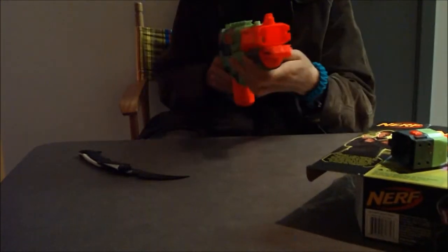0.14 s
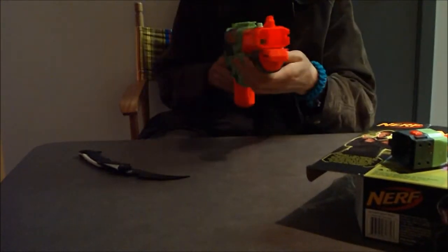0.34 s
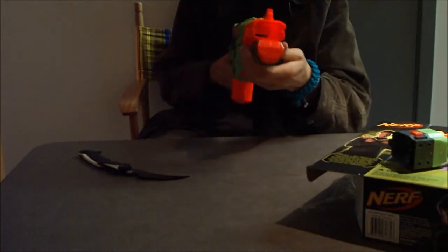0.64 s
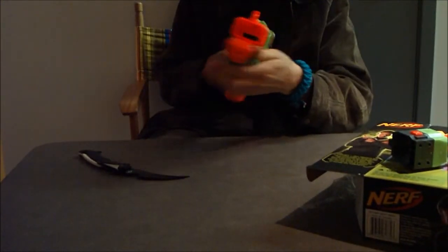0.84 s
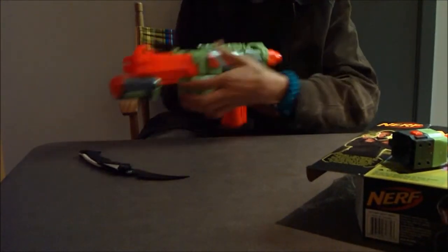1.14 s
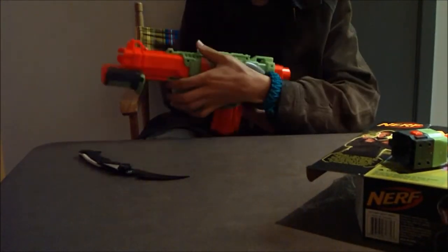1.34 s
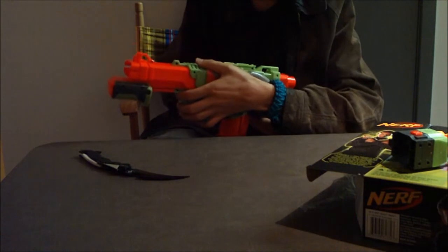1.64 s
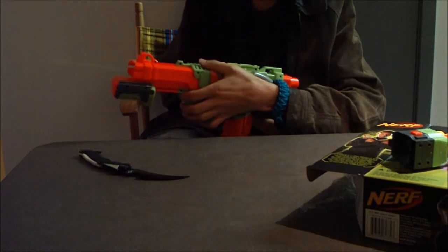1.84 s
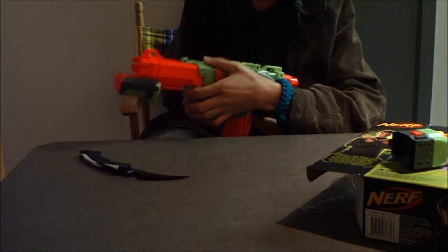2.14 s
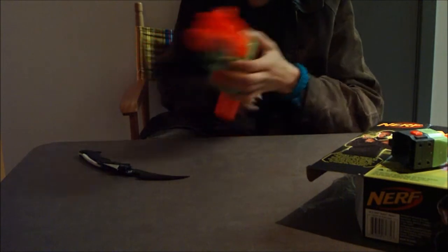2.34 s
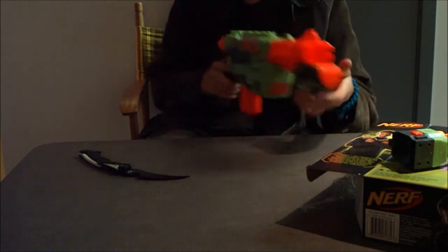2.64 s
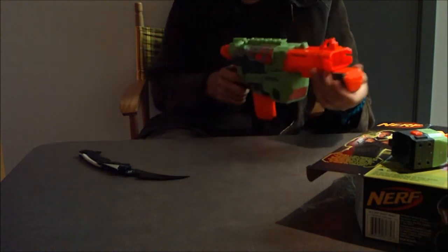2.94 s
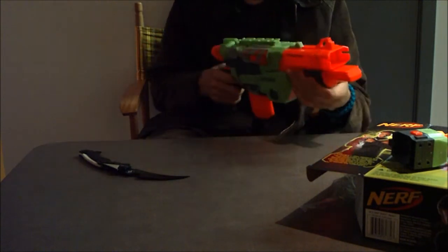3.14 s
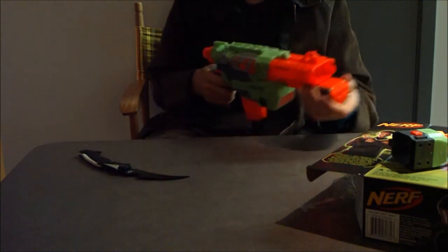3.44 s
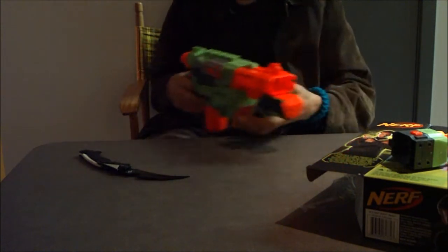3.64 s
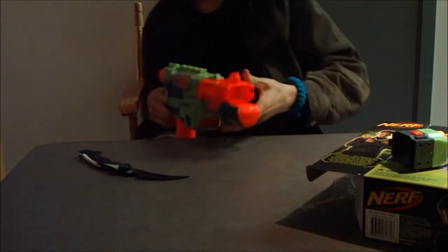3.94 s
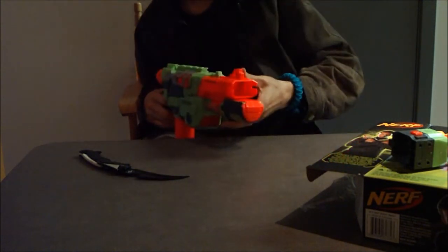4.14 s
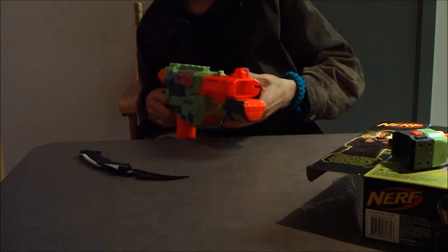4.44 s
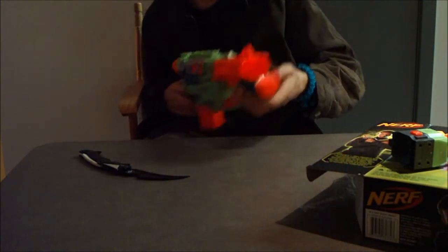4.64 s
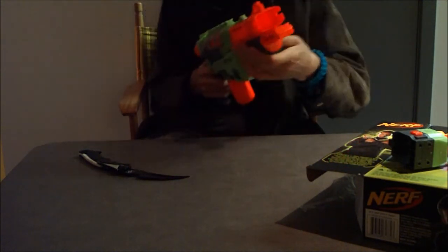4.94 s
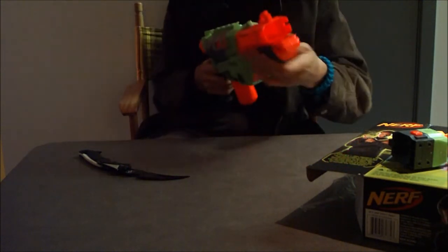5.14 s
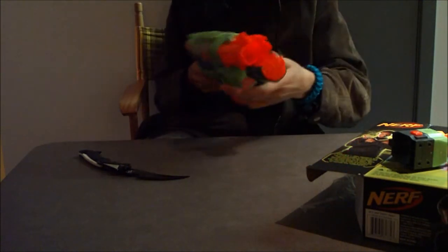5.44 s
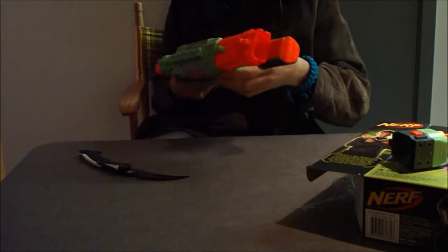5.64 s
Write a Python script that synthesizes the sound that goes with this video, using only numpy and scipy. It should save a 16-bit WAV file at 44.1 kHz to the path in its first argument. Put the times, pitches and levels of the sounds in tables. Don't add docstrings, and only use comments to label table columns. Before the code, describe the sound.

A small indoor room with low appliance hum and soft hiss, heard by a cheap camera microphone with little high treble. At 0 s a plastic slide scrapes to its stop with a clack at 0.06; small clicks at 0.35-0.45 lead to a hard double slam at 0.64. Faint finger taps follow. At 1.91 a loud, dry spring snap fires, with housing rattle and a brief thin ring. A light disc strikes farther away at 2.23 and bounces faster until about 2.57. Hands shift dully on the grip at 2.75-2.97. The slide scrapes back at 3.0-3.13 and slams at 3.41. A second snap comes at 4.31, its disc hitting at 4.53. The magazine knocks hollowly and chatters on the table at 4.69-4.78; a latch catches at 4.80. A last pull clacks at 5.01, then slams home at 5.25, leaving room decay and hum.

```python
import sys
import numpy as np
from scipy import signal
from scipy.fft import rfft, irfft, next_fast_len
from scipy.io import wavfile
from scipy.ndimage import uniform_filter1d, map_coordinates

SR = 44100
rng = np.random.default_rng(int(sys.argv[2]) if len(sys.argv) > 2 else 0)


def output_pcm(signal):
    pcm = np.clip(np.atleast_2d(signal).T, -1, 1) * 32767
    wavfile.write(sys.argv[1], SR, np.round(pcm).astype(np.int16))


def ratio(d):
    e = np.asarray(d, float) / 20
    return 10 ** e


N = 255457

# (centre [Hz], width [Hz], level [dB])
SHELL_MODES = [(750, 204, 0), (850, 110, -7.5), (1360, 25, -2.5), (1790, 50, -7.5), (2170, 30, -9.5),
               (3400, 170, -10), (5830, 530, -17)]


def unit(x):
    return x / np.sqrt(np.mean(x ** 2, axis=-1, keepdims=True) + 1e-20)


def along(points, hz):
    f, v = np.transpose(points)
    return np.interp(np.log(hz + 1), np.log(f + 1), v)


def wobble(rate_hz):
    knots = rng.standard_normal(int(N * rate_hz / SR) + 4)
    return map_coordinates(knots, [np.arange(N) * rate_hz / SR])


def filtered(x, response):
    n = x.shape[-1]
    m = next_fast_len(n + 8192)
    return irfft(rfft(x, m) * response(np.fft.rfftfreq(m, 1 / SR)), m)[..., :n]


def causal(gain):
    c = irfft(np.log(gain + 1e-6))
    half = c.shape[-1] // 2
    c[..., 1:half] *= 2
    c[..., half + 1:] = 0
    return np.exp(rfft(c))


def body(peaks, hz, bed_db):
    power = sum((ratio(db) * w) ** 2 / ((hz - c) ** 2 + w ** 2) for c, w, db in peaks)
    return np.sqrt(power + ratio(bed_db) ** 2)


def tails(count):
    # (frequency [Hz], t60 [s])
    room_t60 = [(150, 0.16), (500, 0.78), (1500, 0.59), (4000, 0.63), (7000, 0.5)]
    hz, t, z = signal.stft(rng.standard_normal((count, int(.8 * SR))), SR, nperseg=256)
    coarse = rng.standard_normal((count, len(hz) // 3 + 1, len(t) // 6 + 1))
    patches = coarse.repeat(3, axis=1).repeat(6, axis=2)[:, :len(hz), :len(t)]
    z = z * ratio(2.2 * patches)
    tail = signal.istft(z * ratio(-60 * t / along(room_t60, hz)[:, None]), SR, nperseg=256)[1]
    tail = tail * (1 - np.exp(-np.arange(tail.shape[1]) / SR / 0.0022))
    return tail / np.linalg.norm(tail, axis=1, keepdims=True)


def contacts(rows, peaks, bed_db, rise_s, low_hz):
    s, db, hollow_db, bright_db, t60_s, room_db = np.transpose(rows)[:, :, None]
    t, hz = np.arange(4096) / SR, np.fft.rfftfreq(8192, 1 / SR)
    burst = rng.standard_normal((len(rows), len(t))) * ratio(-60 * t / t60_s) * (1 - np.exp(-t / rise_s))
    low = np.clip(np.log2(800 / (hz + 1)), 0, 1)
    high = np.clip(np.log2((hz + 1) / 2200), 0, 1)
    tilt = ratio(hollow_db * low + (bright_db + 4.0) * high)
    colour = causal(body(peaks, hz, bed_db) * tilt * hz ** 2 / (hz ** 2 + low_hz ** 2))
    struck = rfft(burst, 8192) * colour
    middle = irfft(struck * ((hz > 700) & (hz < 2500)))
    size = ratio(db) / np.abs(middle).max(axis=1, keepdims=True)
    spread = irfft(colour) * np.linalg.norm(burst, axis=1, keepdims=True)
    sound = size * ratio(room_db) * signal.fftconvolve(spread, tails(count=len(rows)), axes=1)
    sound[:, :8192] += size * irfft(struck * ratio(-3 * high))
    out = np.zeros(N + 2 * SR)
    for start, row in zip(s[:, 0], sound):
        out[max(round((start - rise_s) * SR), 0):][:len(row)] += row
    return out[:N]


def kind(events, colour):
    hollow_db, bright_db, t60_s, room_db = colour
    return [(s, db, hollow_db, bright_db + sum(turn_db), t60_s, room_db) for s, db, *turn_db in events]


def shots():
    # (time [s], plunger [dB], sear [dB], housing [dB], plunger t60 [s])
    blows = [
        (1.9108, -6.5, -13, -16.5, .016),
        (4.309, -8.5, -13.5, -18, .024),
    ]
    # (centre [Hz], width [Hz], level [dB])
    muzzle = [(1020, 550, -4.5), (1460, 130, -3.5), (2680, 220, -8), (4400, 73, -4), (6100, 220, -4)]
    rows = kind([(s - .037, -43) for s, *_ in blows], (3, -17, .028, -5))
    rows += kind([(s - .007, sear_db) for s, _, sear_db, *_ in blows], (-3, -8, .055, -8))
    for s, plunger_db, *_, t60_s in blows:
        rows += kind([(s, plunger_db)], (0, -8, t60_s, -8))
    rows += kind([(s + .004, housing_db) for s, *_, housing_db, _ in blows], (2, -4, .04, 5.5))
    return contacts(rows, muzzle, bed_db=-5.5, rise_s=.00084, low_hz=253)


def shell_contacts(rows):
    return contacts(rows, SHELL_MODES, bed_db=-8.5, rise_s=.001205, low_hz=209)


def strokes():
    # (time [s], peak [dB], rebound under the stop [dB], extra treble [dB])
    pulls = [
        (.062, -19.5, -2.5, -1),
        (3.129, -13.5, -3.5, -5),
        (5.011, -14, -2, -1),
    ]
    # (time [s], peak [dB], spring lead [s], spring under the stop [dB], extra treble [dB])
    pushes = [
        (.639, -13.5, 0.018, -17, 0.5),
        (3.406, -12, .008, -3.5, 1),
        (5.249, -14, .011, -4, 0),
    ]
    rebound_s = .006
    stops = [(s, db, turn_db) for s, db, *_, turn_db in pulls + pushes]
    rebounds = [(s + rebound_s, db + under_db, turn_db) for s, db, under_db, turn_db in pulls]
    rebounds += [(s + rebound_s, db - 1, turn_db) for s, db, *_, turn_db in pushes]
    springs = [(s - lead_s, db + under_db) for s, db, lead_s, under_db, _ in pushes]
    return shell_contacts(kind(stops, (-8, -8, .024, -2.5)) + kind(rebounds, (-7, -6, .036, -2))
                          + kind(springs, (-10, -17, .05, -2)))


def clacks():
    # (time [s], peak [dB], extra treble [dB])
    clicks = [(.017, -26, 3), (.356, -34.5, 3.5), (.384, -29.5, -5), (.434, -25.5, 1), (.455, -29.5, 5),
              (.602, -26, -8), (3.01, -30.5, -11), (3.051, -27, 0), (3.093, -27, -5), (3.308, -32.5, 1),
              (3.334, -25.5, -3.5), (3.365, -26, 2), (4.94, -28.5, -6), (4.967, -28, -11),
              (5.172, -27.5, -6), (5.204, -26, 7)]
    return shell_contacts(kind(clicks, (-15, -9, .042, -2)))


def slide():
    # (start [s], stop [s], level at start [dB], level at stop [dB])
    rubs = [
        (0, 0.065, -30.5, -31),
        (0.372, .48, -39, -37),
        (0.597, 0.639, -46, -22),
        (2.961, 3.13, -45.5, -32),
        (3.351, 3.397, -34, -29),
        (4.94, 5.02, -42, -25.5),
        (5.186, 5.243, -38.5, -26),
    ]
    t = np.arange(N) / SR
    grains = rng.standard_normal(N) * ratio(2.5 * rng.standard_normal(N)) * (rng.random(N) < .4)

    def upper(hz):
        return 1 / (1 + (2600 / (hz + 1)) ** 4)

    dull = unit(filtered(grains, lambda hz: body(SHELL_MODES, hz, bed_db=0) * (hz > 200) * (1 - upper(hz))))
    bright = unit(filtered(grains, lambda hz: body(SHELL_MODES, hz, bed_db=-19) * upper(hz) * (hz < 8000)))
    level, shine = np.zeros(N), np.zeros(N)
    bright_db = np.array([-8, 2])
    for start, stop, *ends_db in rubs:
        s, db = [start, stop], np.array(ends_db)
        level += ratio(np.interp(t, s, db - 5, -150, -150))
        shine += ratio(np.interp(t, s, db + bright_db - 6, -150, -150))
    rub = uniform_filter1d(level, 300) * dull + uniform_filter1d(shine, 300) * bright
    rub = ratio(1.3 * wobble(60)) * rub
    return rub + ratio(-2) * signal.fftconvolve(rub, tails(count=1)[0])[:N]


def latch():
    # (time [s], peak [dB])
    catches = [
        (4.798, -24.5),
        (4.805, -18),
        (4.821, -36),
    ]
    # (centre [Hz], width [Hz], level [dB])
    housing = [(218, 45, 14.5), (850, 150, -1.5), (1250, 150, 1), (2470, 140, -3.5), (3980, 340, 0.5)]
    return contacts(kind(catches, (-6.5, -4.5, .12, -4.5)), housing, bed_db=-13, rise_s=.00052, low_hz=150)


def rings():
    # (time [s], frequency [Hz], level [dB], t60 [s])
    ringing = [(1.912, 4500, -36.5, .7), (4.31, 4520, -34, .7), (4.31, 3745, -36, .5), (.645, 915, -37, .6),
               (.642, 540, -33, .4), (3.415, 937, -31, .5), (5.255, 800, -32, .4), (5.252, 620, -33, .4),
               (4.70, 352, -29, .35), (4.70, 540, -28, .5), (4.80, 210, -29, .4), (.06, 250, -39, .3)]
    t, out = np.arange(N) / SR, np.zeros(N)
    for s, hz, db, t60_s in ringing:
        age = np.maximum(t - s, 0)
        blur = np.exp(1.2j * wobble(15 + hz / 28)) * ratio(3 * wobble(15 + hz / 60))
        envelope = ratio(db - 60 * age / t60_s) * (1 - np.exp(-age / .0034))
        out += envelope * np.real(blur * np.exp(2j * np.pi * hz * t))
    return out


def flying_disc():
    # (time [s], peak [dB], extra treble [dB])
    landings = [
        (2.225, -23, -2.5),
        (2.364, -31, 4),
        (2.444, -27.5, -12),
        (2.496, -40.5, -3),
        (2.539, -35.5, -3),
        (2.564, -41, -4),
        (4.534, -26.5, 3),
    ]
    # (centre [Hz], width [Hz], level [dB])
    wall = [(1010, 280, 1.5), (1480, 130, -2), (3070, 210, 0.5), (5600, 690, -2)]
    flops = [(s + .021, db - 10) for s, db, _ in landings]
    rows = kind(landings, (-20, -11, .042, -6)) + kind(flops, (-14, -9, .045, -4))
    return contacts(rows, wall, bed_db=-6.5, rise_s=.002, low_hz=200)


def table_knocks():
    # (time [s], peak [dB])
    bumps = [
        (4.685, -23),
        (4.691, -26),
        (4.699, -22.5),
        (4.704, -27),
        (4.714, -25),
        (4.723, -31.5),
        (4.739, -24.5),
        (4.751, -32.5),
        (4.782, -30.5),
    ]
    # (centre [Hz], width [Hz], level [dB])
    tabletop = [(266, 13.6, 6), (390, 120, -4), (534, 200, -6.5), (900, 180, -10), (1380, 54, -19),
                (3800, 900, -15.5)]
    dulls_db_per_s = -200
    events = [(s, db, dulls_db_per_s * (s - bumps[2][0])) for s, db in bumps]
    return contacts(kind(events, (3.5, -6, .04, -1.5)), tabletop, bed_db=-28, rise_s=.002, low_hz=163)


def grip():
    # (time [s], peak [dB])
    squeezes = [(2.752, -40), (2.778, -38), (2.817, -35), (2.831, -41), (2.902, -28), (2.911, -31.5),
                (2.924, -29.5), (2.937, -30.5), (2.953, -30), (2.974, -46)]
    # (centre [Hz], width [Hz], level [dB])
    damped = [(170, 41, -2), (450, 140, -9.5), (810, 88, -4), (1270, 230, -11.5), (3030, 270, -17)]
    return contacts(kind(squeezes, (4, -12, .065, -2)), damped, bed_db=-17.5, rise_s=.003, low_hz=100)


def finger_ticks():
    # (time [s], peak [dB], extra treble [dB])
    taps = [(.899, -40, 2), (1.184, -47, -4), (1.615, -49.5, -8), (3.837, -42, 0), (3.912, -39, -20)]
    return shell_contacts(kind(taps, (-10, -11, .045, 0)))


def ambience():
    # (frequency [Hz], density [dB per Hz])
    air_spectrum = [(12, -42), (20, -13.5), (37, -1.5), (53, -15), (69, -11.5), (123, -9.5), (146, -8),
                    (308, -13), (385, -15), (415, -24), (506, -21.5), (735, -18.5), (874, -22),
                    (5780, -38.5), (7600, -36.5), (9880, -77.5), (16700, -120)]
    # (frequency [Hz], rms [dB])
    hum_lines = [(80.7, -48), (118.4, -48), (414.5, -54), (473.7, -62), (726.7, -62), (818.3, -63.5)]
    t = np.arange(N) / SR
    air = unit(filtered(rng.standard_normal(N), lambda hz: ratio(along(air_spectrum, hz))))
    out = ratio(-45.5 + 0.2 * wobble(2.864)) * air
    for hz, db in hum_lines:
        level = np.sqrt(2) * ratio(db + 1.6 * wobble(13))
        out += level * np.sin(2 * np.pi * hz * t + 9 / np.sqrt(hz) * wobble(6.4))
    return out


def scene():
    blaster = shots() + strokes() + clacks() + slide() + latch() + rings()
    hands = grip() + finger_ticks()
    return (blaster + flying_disc() + table_knocks() + hands + ambience())[None]


def starved(x, hole_share):
    hz, t, z = signal.stft(x, SR, nperseg=1024)
    middle_db = 10 * np.log10(np.mean(np.abs(z[60:160]) ** 2, axis=0) + 1e-14)
    loud = np.clip((middle_db + 80) / 35, 0, 1)
    draw = rng.random((len(hz) // 6 + 1, len(t) // 2 + 1))
    draw = draw.repeat(6, axis=0).repeat(2, axis=1)[:len(hz), :len(t)]
    edge_hz = 7000 + 450 * loud + 450 * draw[0] ** 2
    kept = (hz[:, None] < edge_hz) & (draw > hole_share * (hz[:, None] / 7000) ** 4)
    return signal.istft(z * np.where(kept, 1, ratio(-35)), SR, nperseg=1024)[1][:N]


def top_cut(x):
    return signal.sosfilt(signal.butter(12, 7750, fs=SR, output="sos"), x)


def record(dry):
    # (time [s], push [dB], sag [dB], recovery [s])
    swings = [
        (.640, -21, -30, .06),
        (1.908, -17, -27, .13),
        (3.129, -22, -38, .05),
        (3.405, -19.5, -26, .06),
        (4.304, -17, -26, .08),
        (4.712, -50, -32, .04),
        (4.806, -33, -55, .05),
        (5.011, -31, -29, .05),
        (5.249, -22, -27, .05),
    ]
    # (frequency [Hz], gain [dB])
    band_limit = [(6700, -0.5), (7200, -9.5), (7700, -39), (7950, -37), (15500, -37), (16000, -65)]
    t, swing = np.arange(N) / SR, np.zeros(N)
    for s, up_db, sag_db, recover_s in swings:
        age, late = np.maximum(t - s, 0), np.maximum(t - s - .04, 0)
        swing += ratio(up_db + 3) * (1 - np.exp(-age / .004)) * np.clip(1 - age / .047, 0, 1)
        sag = (1 - np.exp(-late / .01)) * np.exp(-late / recover_s)
        swing -= ratio(sag_db + 1) * sag * ratio(2 * wobble(25))
    patchy = starved(dry[0] + swing, hole_share=0.13)[None]
    heard = filtered(patchy, lambda hz: ratio(along(band_limit, hz)))
    return top_cut(heard)


dry = scene()
out = record(dry)
output_pcm(out)
```